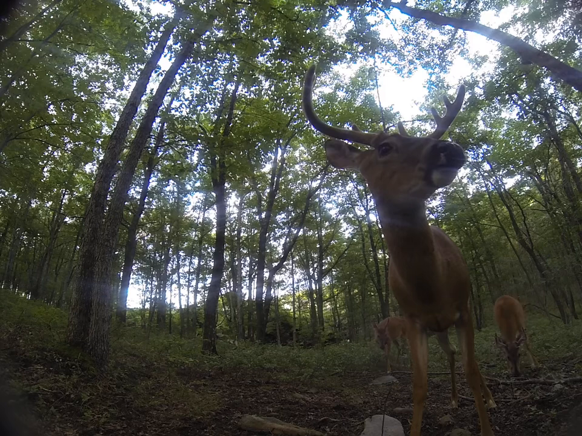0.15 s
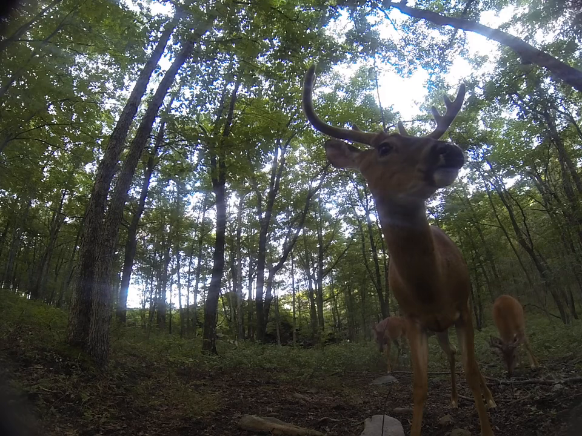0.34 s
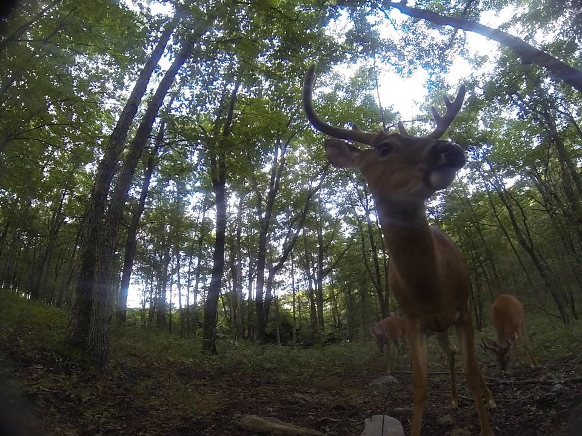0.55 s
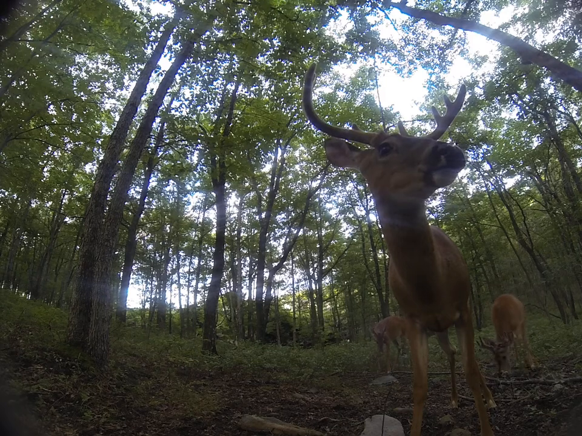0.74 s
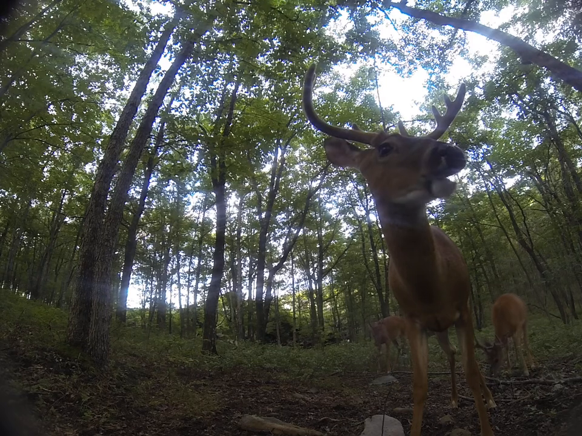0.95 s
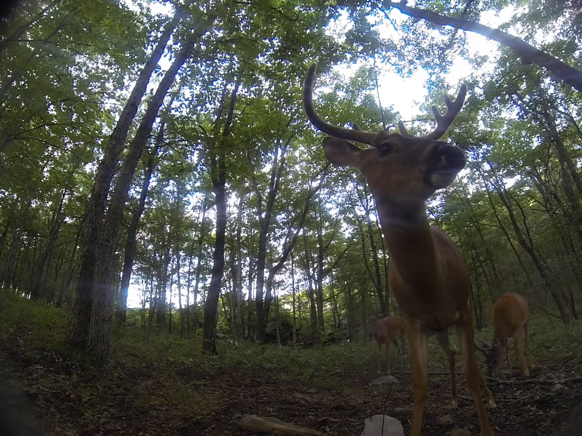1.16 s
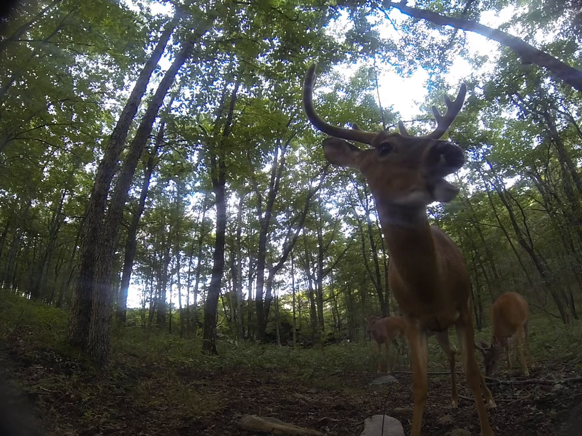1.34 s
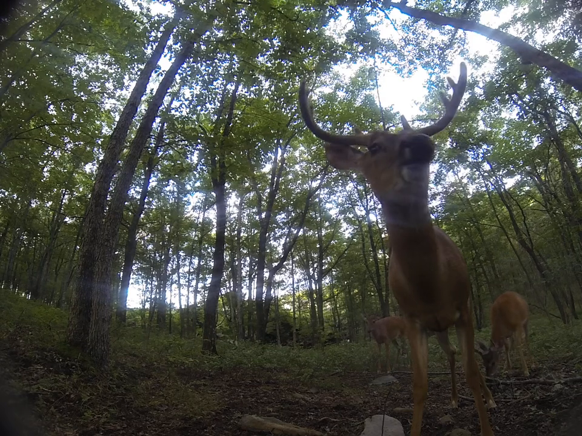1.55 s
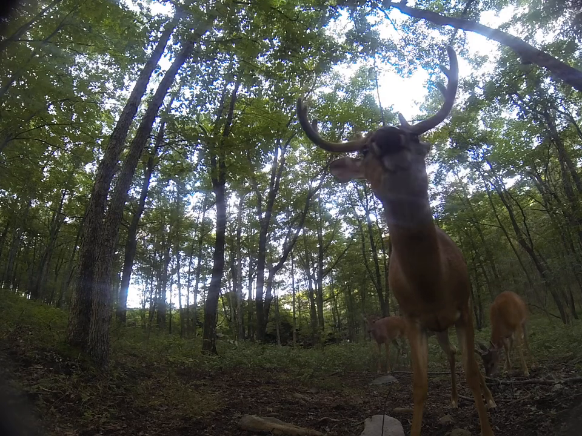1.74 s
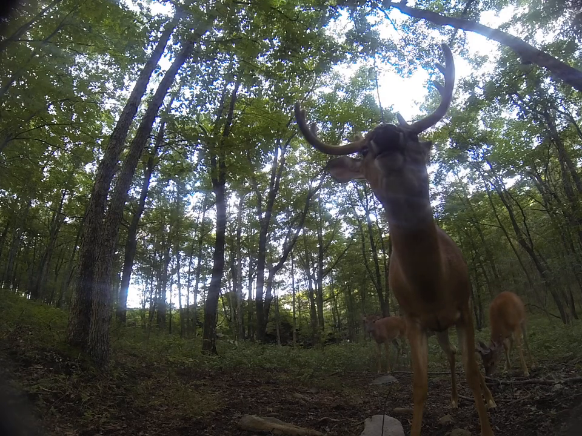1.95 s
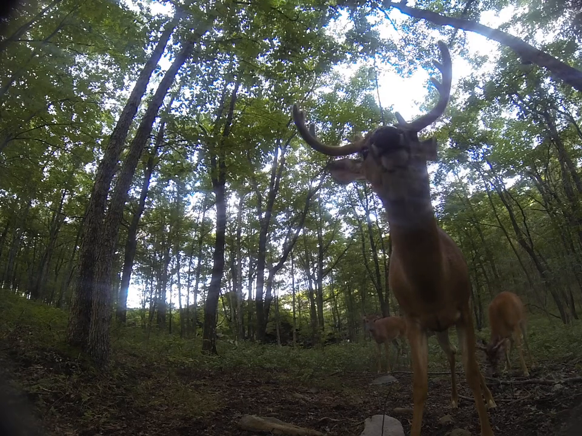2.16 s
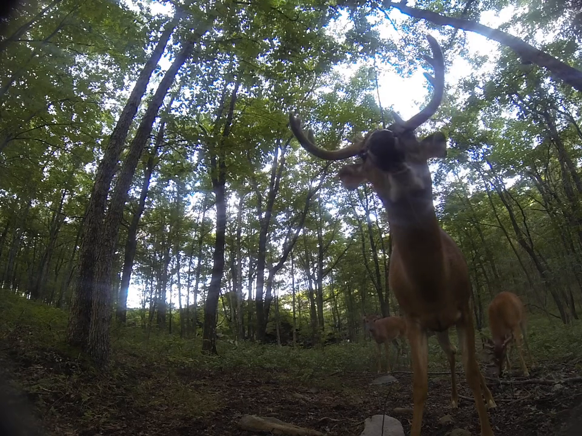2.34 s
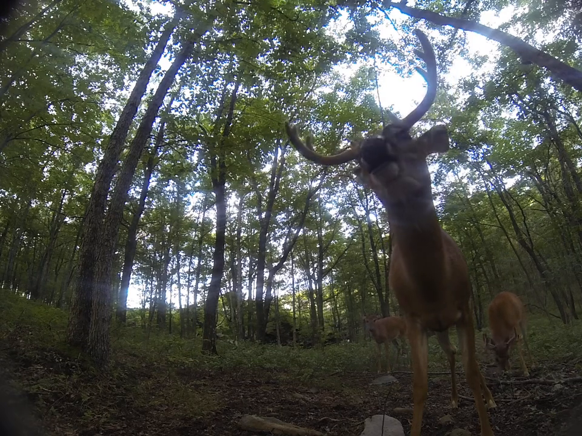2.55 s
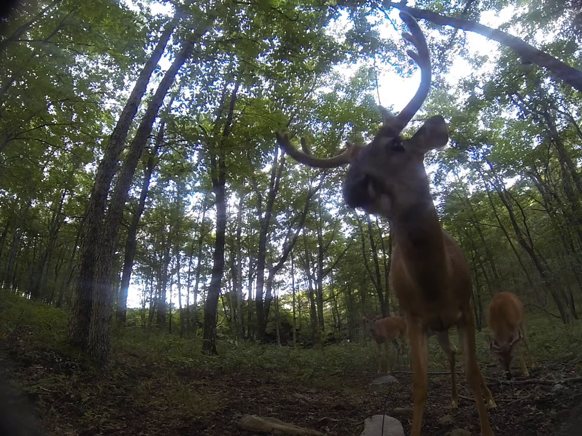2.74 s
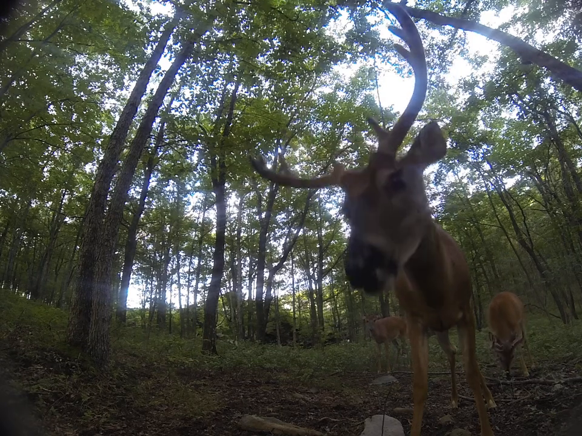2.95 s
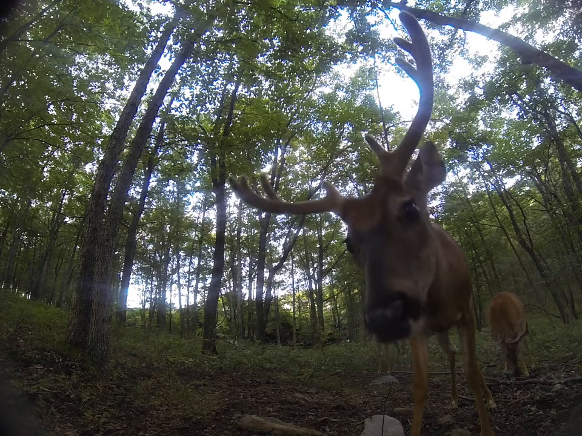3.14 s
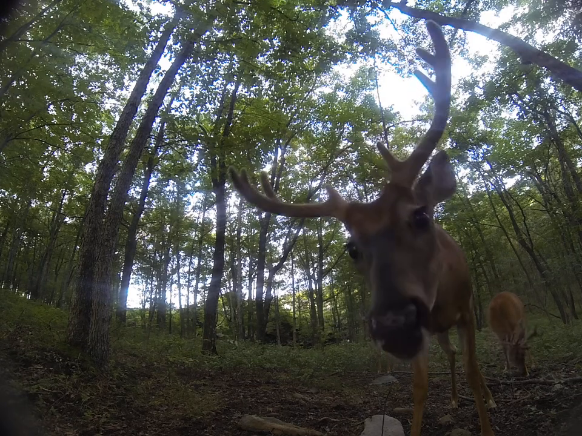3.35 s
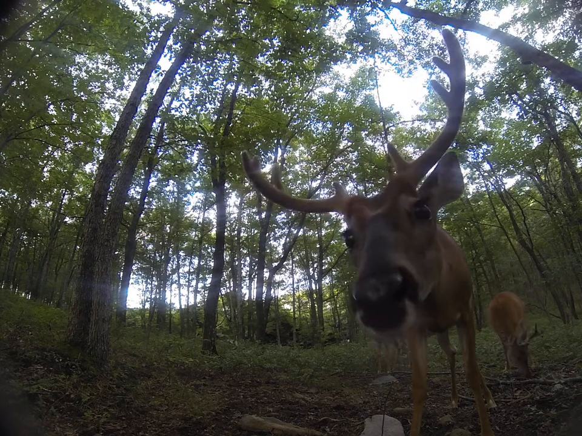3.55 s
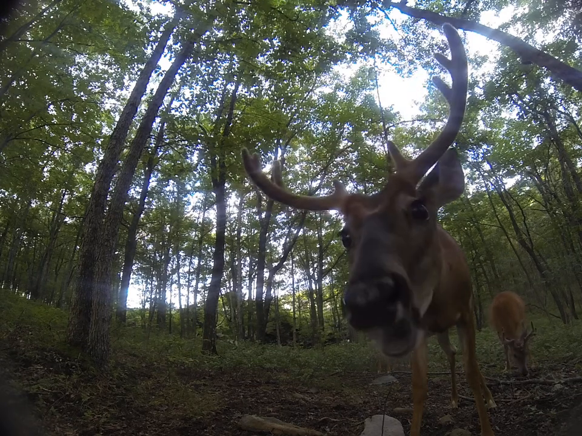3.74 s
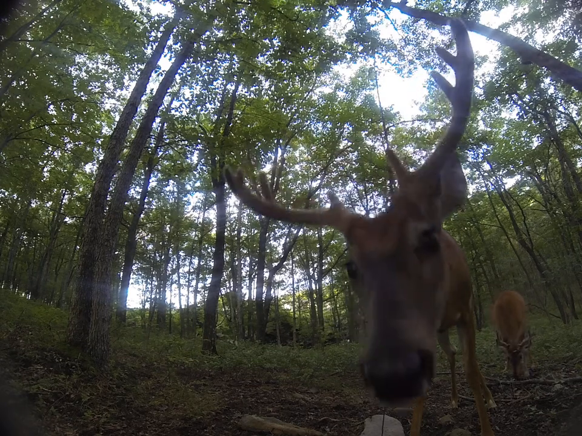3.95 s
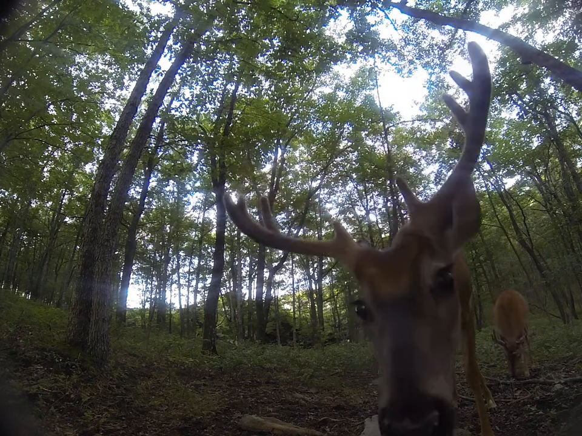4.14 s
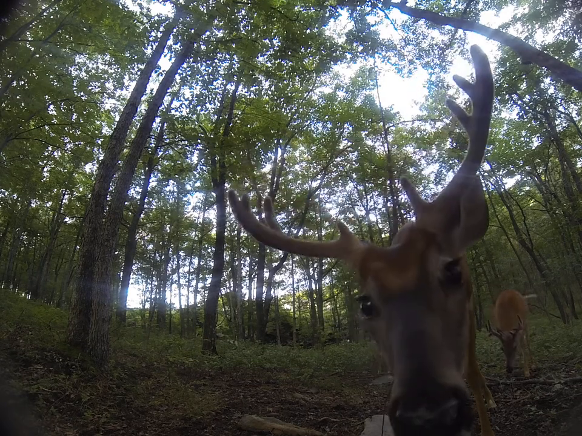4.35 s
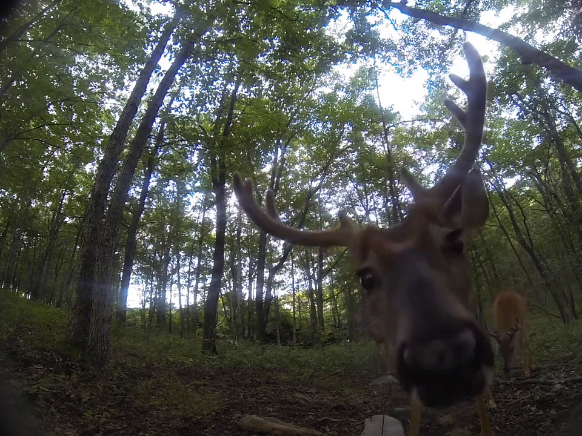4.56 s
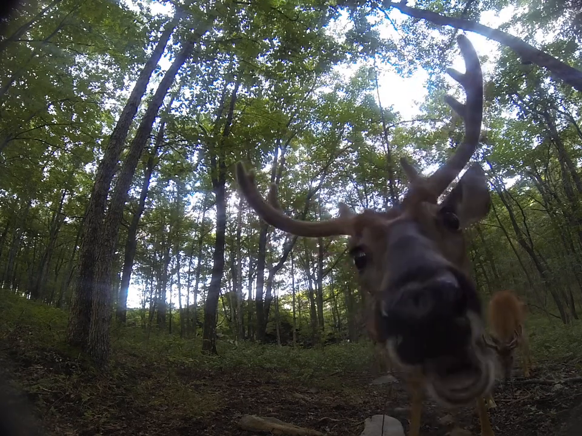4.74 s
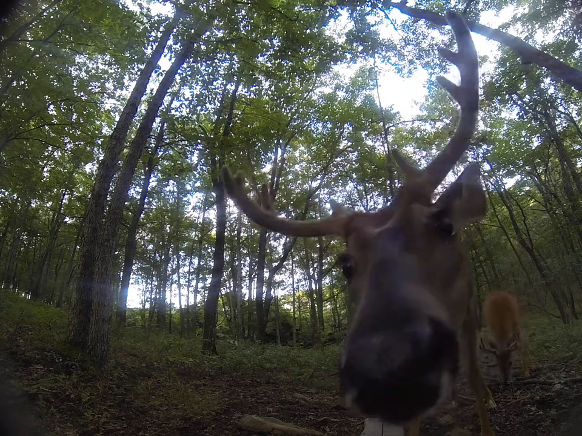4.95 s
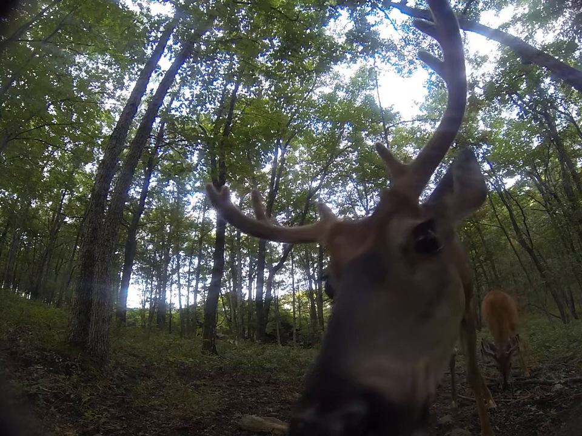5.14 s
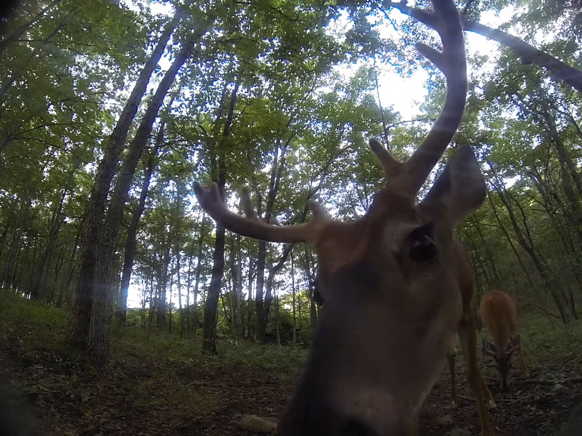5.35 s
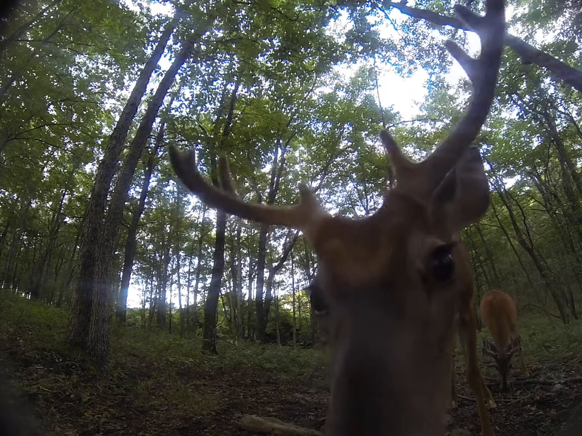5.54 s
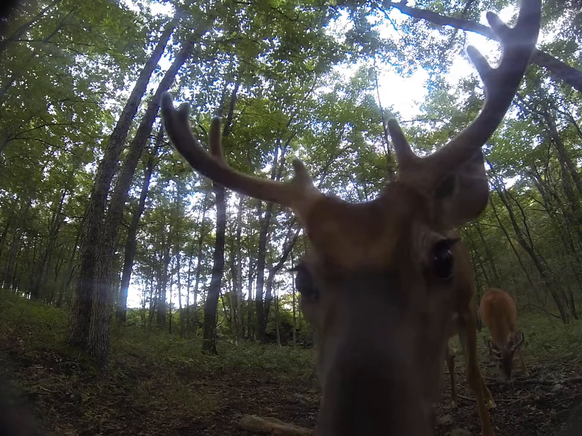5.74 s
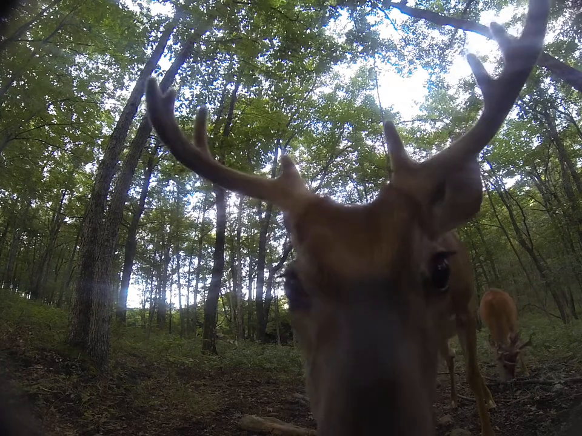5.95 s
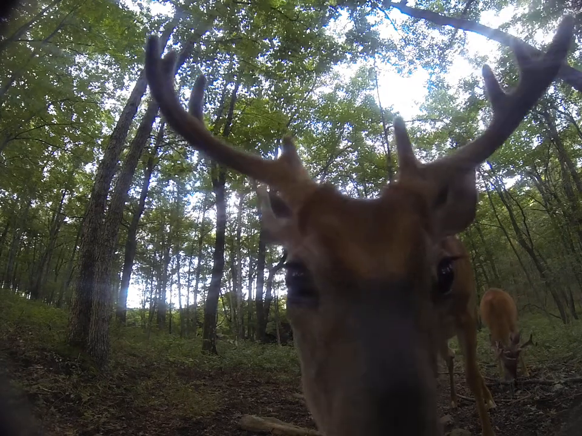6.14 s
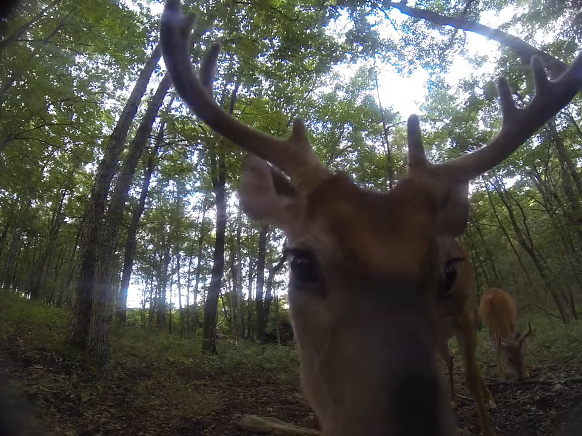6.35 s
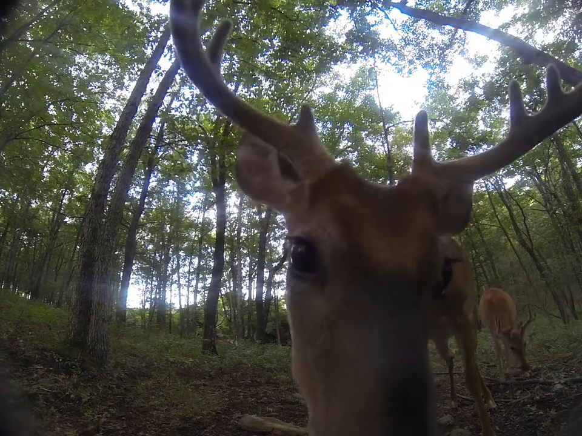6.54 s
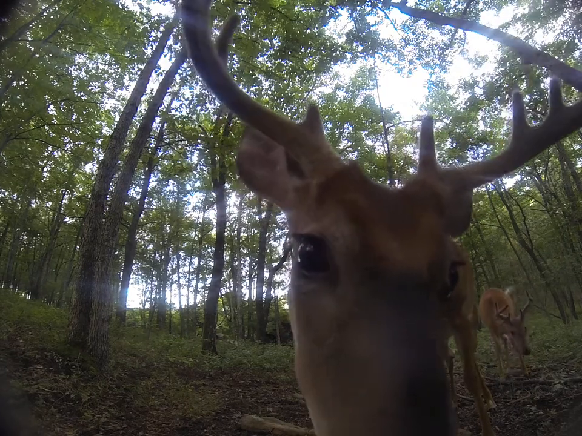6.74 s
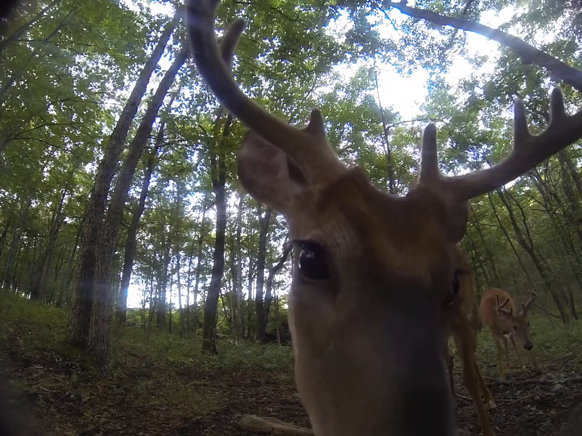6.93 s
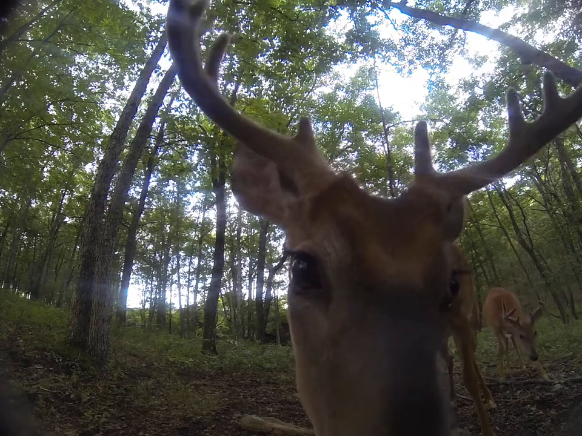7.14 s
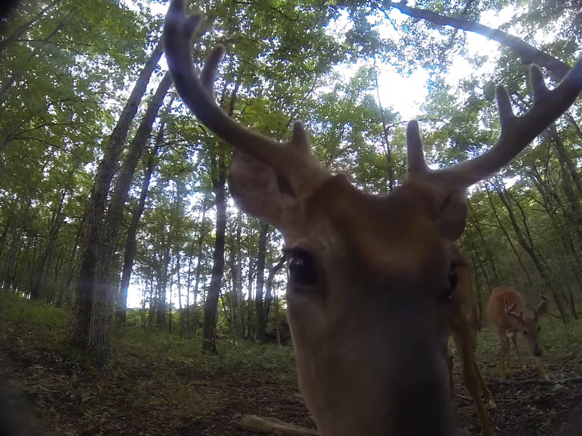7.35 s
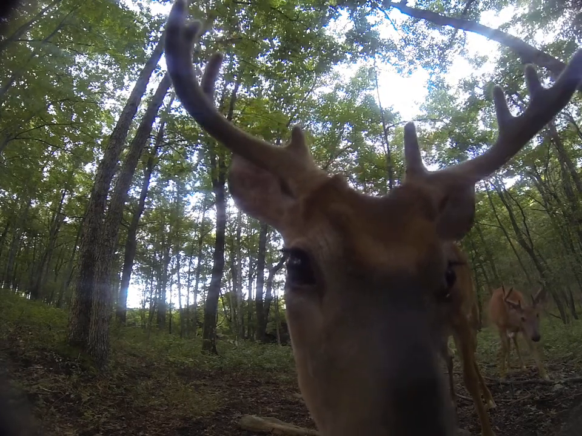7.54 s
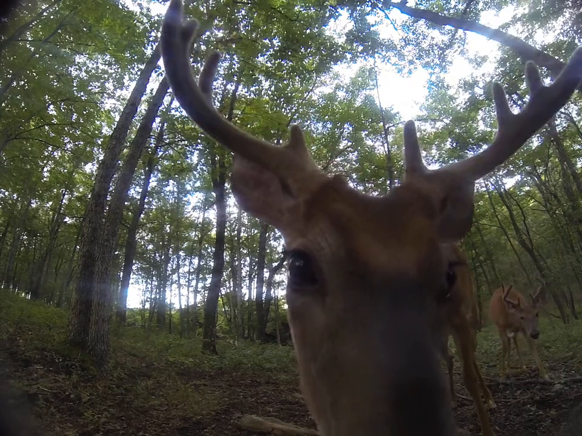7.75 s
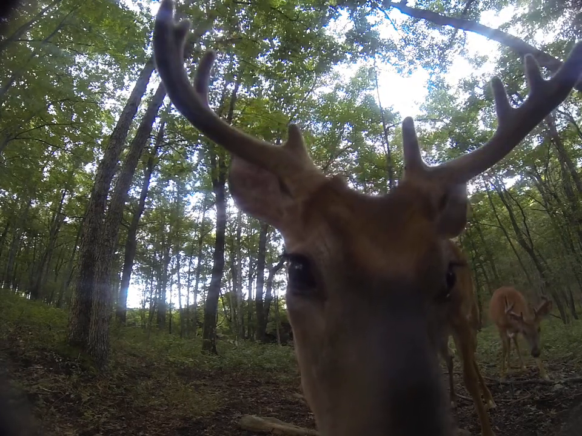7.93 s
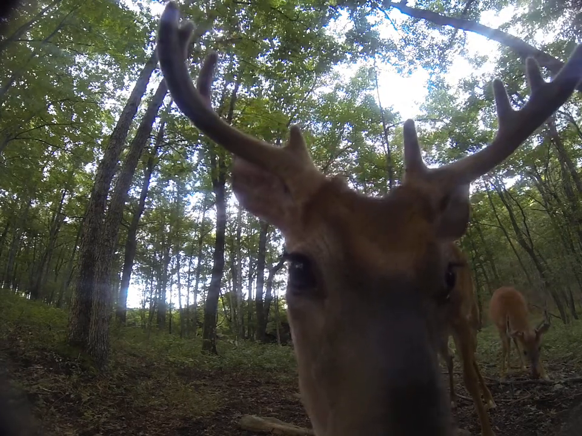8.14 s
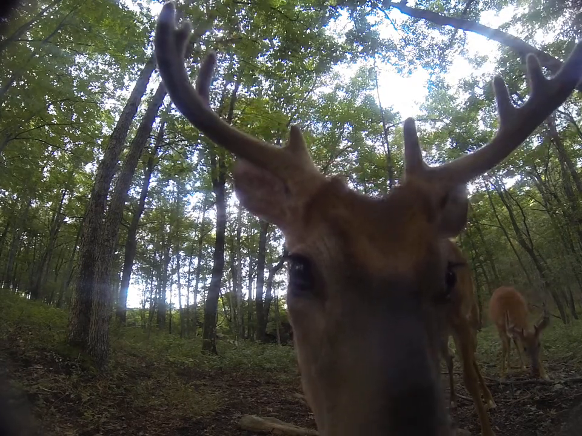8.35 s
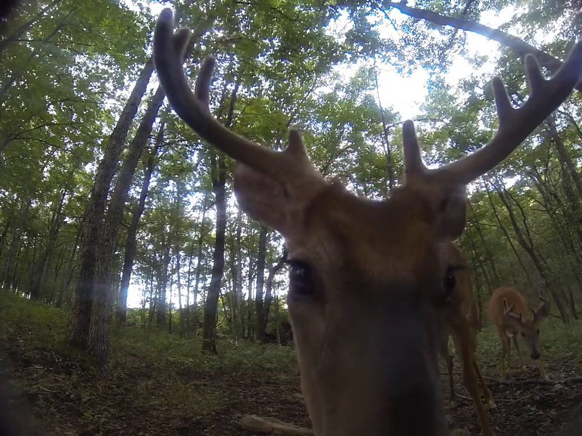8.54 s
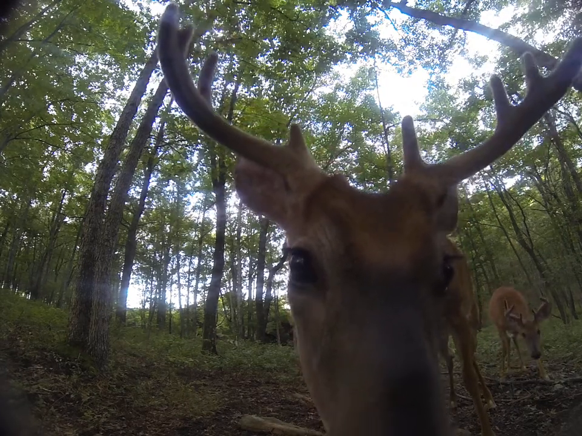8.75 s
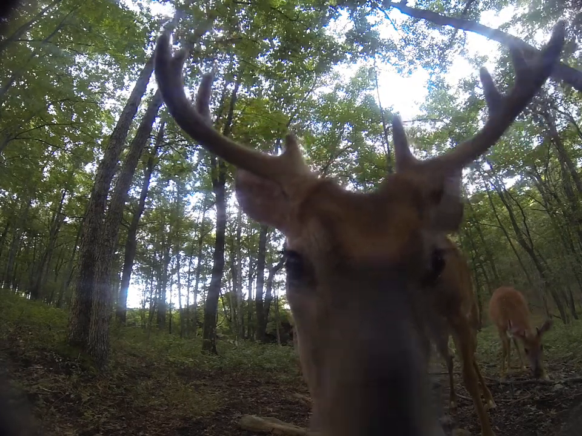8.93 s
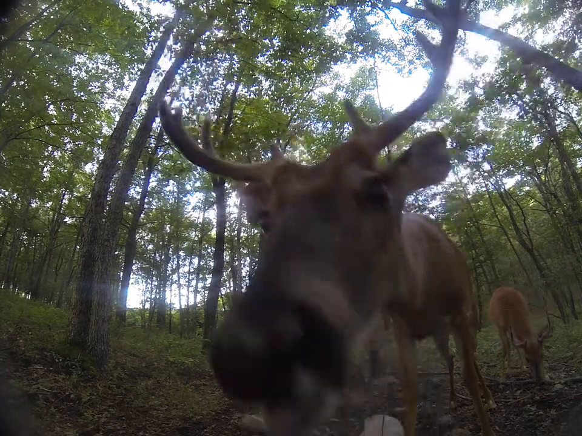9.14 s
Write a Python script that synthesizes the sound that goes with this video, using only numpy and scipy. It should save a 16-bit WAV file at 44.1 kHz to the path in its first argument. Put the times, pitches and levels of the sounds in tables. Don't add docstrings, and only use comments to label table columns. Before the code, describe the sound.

A sealed-case microphone on the forest floor gives a dull, hissy near silence with sparse chewing clicks. Then a deer rubs directly on the case, with dense, irregular hard plastic knocks, wet skin catching and slipping, short ringing rasps and a deep rocking rumble. The contact thins, one big low thud lands, and faint brushing gives way to leaves as the animal backs off.

```python
import sys
import numpy as np
from scipy import signal
from scipy.fft import rfft, irfft, next_fast_len
from scipy.io import wavfile
from scipy.ndimage import uniform_filter1d, map_coordinates

SR = 44100
rng = np.random.default_rng(int(sys.argv[2]) if len(sys.argv) > 2 else 0)


def dump(signal):
    limited = np.clip(np.atleast_2d(signal).T, -1, 1)
    pcm = np.round(limited * 32767).astype(np.int16)
    wavfile.write(sys.argv[1], SR, pcm)


def convert_level_to_amplitude(level_db):
    exponent = np.asarray(level_db, float) / 20
    return 10 ** exponent


N = 409688

CRACK = 1.17


def unit(x):
    return x / np.sqrt(np.mean(x ** 2) + 1e-20)


def wobble(rate):
    values = rng.standard_normal(int(N * rate / SR) + 4)
    return map_coordinates(values, [np.arange(N) * rate / SR])


def curves(rows):
    s, *columns = np.transpose(rows)
    return [np.interp(np.arange(N) / SR, s, column, left=-120) for column in columns]


def place(times, shapes):
    starts = np.round(np.asarray(times) * SR).astype(int)[:, None]
    at = starts + np.arange(shapes.shape[1])
    return np.bincount(at.ravel(), shapes.ravel(), N + SR)[:N]


def filtered(x, response):
    n = x.shape[-1]
    padded = 2 * next_fast_len(n // 2 + 2048)
    spectrum = rfft(x, padded) * response(np.fft.rfftfreq(padded, 1 / SR))
    return irfft(spectrum, padded)[..., :n]


def along(points, hz):
    f, db = np.transpose(points)
    return convert_level_to_amplitude(np.interp(np.log(hz + 1), np.log(f), db))


def quieter(table, drop_db):
    return [(centre, width, db - drop_db) for centre, width, db in table]


# f/Hz, level/dB
WALL = [(20, 8.5), (780, 7), (1010, -8.5), (1210, 3), (6000, -9), (11000, -17), (14000, -14.5),
        (16000, -43.5)]


def resonance(table, hz):
    power = 0
    for centre, width, db in table:
        damping = (hz * width) ** 2
        peak = damping / ((centre * centre - hz * hz) ** 2 + damping)
        power = power + convert_level_to_amplitude(2 * db) * peak ** 2
    return np.sqrt(power) * along(WALL, hz)


def modes(table, hz):
    cepstrum = irfft(np.log(resonance(table, hz) + 1e-7))
    cepstrum[1:len(hz) - 1] *= 2
    cepstrum[len(hz):] = 0
    return np.exp(rfft(cepstrum))


def snaps(times, parts, rise_s, t60_s, blow=0, size=2048):
    t = np.arange(size) / SR
    draw = rng.standard_normal((len(times), size + 1))
    fall_s = t60_s * convert_level_to_amplitude(2.5 * draw[:, :1])
    force = draw[:, 1:] * (1 - np.exp(-t / rise_s)) ** 2 * convert_level_to_amplitude(-60 * t / fall_s)
    force[:, int(rise_s * SR)] += blow * np.sign(draw[:, 0]) * np.linalg.norm(force, axis=1)
    out = 0
    for table, peak_db in parts:
        rung = filtered(force, lambda hz: modes(table, hz))
        out = out + convert_level_to_amplitude(peak_db)[:, None] * rung / np.abs(rung).max(axis=1, keepdims=True)
    return place(times, out)


# f/Hz, level/dB per Hz
HISS = [(20, -1), (100, -3.5), (300, -13), (1000, -21.5), (3000, -32.5), (8000, -34), (14800, -39.5),
        (15300, -67)]
# f/Hz, level/dB rms
CLOCK = [(2000, -91), (3000, -82), (4000, -98), (5000, -96)]


def electronics():
    t = np.arange(N) / SR
    hiss = unit(filtered(rng.standard_normal(N), lambda hz: along(HISS, hz)))
    tones = sum(np.sqrt(2) * convert_level_to_amplitude(db) * np.sin(2 * np.pi * hz * t) for hz, db in CLOCK)
    frame_hz = 47.952
    begin, end = .405, .82
    frame, part = np.divmod(t * frame_hz, 1)
    since_s = (part - begin) / frame_hz
    reading = uniform_filter1d(1. * (part > begin) * (part < end), size=30)
    start = rng.uniform(0, 2 * np.pi, int(frame[-1]) + 1)[frame.astype(int)]
    high = np.sin(2 * np.pi * 12895 * since_s + start)
    low = np.sin(2 * np.pi * 6480 * since_s + np.pi / 2 * (frame % 2) + .3 * start)
    whine = reading * (convert_level_to_amplitude(-71) * high + convert_level_to_amplitude(-73) * low)
    return convert_level_to_amplitude(-61.0) * hiss + tones + whine


# f/Hz, width/Hz, level/dB
AIR = [(1560, 350, 1), (2160, 840, -3), (2940, 620, 8), (3670, 2200, -3.5), (5400, 890, 3.5),
       (6740, 710, -10.5), (8240, 710, -6), (9200, 360, -7), (10580, 610, 3.5), (13000, 1800, -3.5)]
# t/s, rise of the rustle level/dB
RETREAT = [
    (8.6, -4),
    (8.85, -1),
    (9.051, 0),
    (9.21, 4.5),
    (9.29, -0.5),
]


def wood():
    near_db = np.interp(np.arange(N) / SR, *np.transpose(RETREAT), left=0)
    crackle_db = near_db * (1 + .7 * wobble(97))
    rustle = convert_level_to_amplitude(crackle_db + 0.66 * wobble(3.7)) * rng.standard_normal(N)
    return convert_level_to_amplitude(-59.0) * filtered(rustle, lambda hz: resonance(AIR, hz))


# f/Hz, width/Hz, level/dB
PORT = [(1566, 253, 0)]
PORT_UPPER = [(2040, 680, 5), (2310, 350, 6.5), (3590, 500, -6), (4370, 550, -9), (8200, 830, -3)]
# t/s, peak level/dB, upper resonance level/dB against the peak
CHEWS = [(0.098, -48.5, -17), (0.186, -46, 3.5), (0.579, -51, 7.5), (0.6705, -55.5, 7.5), (1.046, -56, -15),
         (1.695, -41, 4.5), (1.7022, -47, -17), (1.709, -49, -17), (2.049, -51.5, 5), (2.062, -58, 0),
         (2.078, -36.5, -5.5), (2.274, -63, 5), (2.673, -56, 2), (4.497, -49, -7), (4.655, -55, 0),
         (4.928, -55, -5), (5.051, -56, -7), (5.581, -50, -3), (5.589, -55, -3), (5.598, -61, -4),
         (5.667, -51, 2), (5.673, -45, 7), (1.55, -58, -2), (2.6, -60, 4), (3.4, -57, -5),
         (9.194, -54, 5.5), (9.205, -44, -2), (9.13, -52, 3.5), (9.245, -58, 8), (2.1321, -49, -16),
         (2.137, -53, -22), (2.313, -55, -14), (2.6664, -55, 8), (2.705, -53, -14), (2.997, -49, -10),
         (3.445, -53, -16), (3.925, -46.5, -5), (3.972, -43.5, -19), (4.488, -55, -7), (4.525, -44.5, 0),
         (4.917, -35, -2), (4.959, -49.5, -20), (5.028, -54, 2), (5.04, -52.5, 3), (5.3896, -53.5, 0),
         (5.465, -55, 0), (5.523, -44.5, -2), (5.573, -43, -3), (5.6434, -62, 1)]


def chews():
    s, db, upper_db = np.transpose(CHEWS)
    parts = [(PORT, db - .6), (PORT_UPPER, db + upper_db - .6)]
    return snaps(s - .0005, parts, rise_s=0.00062, t60_s=0.015, blow=CRACK)


# t/s, peak level/dB, f/Hz, time to fall by 60 dB t60/s
PUSHES = [(4.485, -52.5, 104, 0.29), (4.723, -48.5, 107, 0.2), (4.811, -50.5, 98, 0.18),
          (5.695, -19, 101, 0.13), (5.911, -14, 88, 0.2), (6.005, -16, 91, 0.19), (6.17, -21, 104, 0.17),
          (6.376, -28.5, 105, 0.38), (6.708, -15.5, 117.6, 0.1), (6.846, -28.5, 117, 0.15),
          (6.956, -18.5, 117.6, 0.1), (7.206, -12.5, 95, 0.22), (7.469, -13, 94, 0.094),
          (7.717, -21.5, 107.4, 0.21), (7.792, -16.5, 82, 0.18), (7.946, -26, 114, 0.17),
          (8.16, -19.5, 91, 0.29), (8.298, -21.5, 92.8, 0.27), (8.585, 3, 94.5, 0.13),
          (8.682, -14.5, 82.1, 0.21), (8.729, -19, 94.4, 0.21)]


def pushes():
    s, db, hz, t60 = np.array(PUSHES).T[:, :, None]
    t = np.arange(SR // 2) / SR
    swing = convert_level_to_amplitude(-60 * t / (1.56 * t60)) * np.sin(2 * np.pi * .88 * hz * t + 1.36)
    jolt = 1.92 * convert_level_to_amplitude(-60 * t / (0.36 * t60)) * np.sin(2 * np.pi * 1.177 * hz * t - .3)
    onset = (1 - np.exp(-t / 0.0058)) ** 2
    return place(s[:, 0], convert_level_to_amplitude(db - 1.74) * onset * (swing + jolt))


# f/Hz, width/Hz, level/dB
MOUNT = [(82, 39, 4.1), (104, 58, 2.3)]
# t/s, shake level/dB, pressure rumble level/dB
LEAN = [(5.5, -80, -95), (5.73, -56, -41), (5.85, -39.5, -41), (6.4, -42, -47.5), (7.1, -42, -37.5),
        (8.06, -42, -44), (8.14, -43.5, -37), (8.55, -62.5, -47), (8.61, -39, -41.5), (8.75, -45, -38),
        (8.96, -56.5, -52.5), (9.16, -57, -68), (9.29, -60.5, -60)]


def lean():
    shake_db, rumble_db = curves(LEAN)
    shake = unit(filtered(rng.standard_normal(N), lambda hz: resonance(MOUNT, hz)))
    air = [(26.3, 12, 0.0088)]  # f/Hz, width/Hz, level/dB
    rumble = unit(filtered(rng.standard_normal(N), lambda hz: resonance(air, hz)))
    return convert_level_to_amplitude(shake_db + 2.2) * shake + convert_level_to_amplitude(rumble_db + 1.8) * rumble


# t/s, length/s, rasp level/dB, ring level/dB against it
RASPS = [(5.694, 0.027, -38.5, -4), (5.73, 0.031, -65, 15), (5.881, 0.02, -33, -4), (6.056, 0.013, -50, -4),
         (6.119, 0.011, -22.5, -3.5), (6.158, 0.034, -33.5, 0), (6.278, 0.015, -28.5, -2),
         (6.311, 0.036, -31, 1), (6.343, 0.02, -29.5, 7.5), (6.403, 0.022, -32, 4.5),
         (6.432, 0.013, -18.5, -2), (6.508, 0.022, -43, 7), (6.566, .02, -52, 0), (6.586, 0.013, -23, 1),
         (6.641, 0.036, -39, -2), (6.707, 0.03, -40, 1), (6.799, 0.068, -47.5, 0),
         (6.948, 0.051, -43.5, 10.5), (7.054, 0.028, -40.5, 4.5), (7.103, 0.027, -40, -1),
         (7.133, 0.034, -42, 12.5), (7.164, 0.023, -47, 0), (7.201, 0.017, -26, -7), (7.307, 0.04, -41, 9),
         (7.358, 0.022, -22.5, 5.5), (7.385, 0.048, -32.5, -0.5), (7.449, 0.035, -34, -1),
         (7.547, 0.034, -51, 13), (7.608, 0.027, -34, 0), (7.64, 0.035, -36, 7), (7.682, 0.022, -28, -7),
         (7.708, 0.042, -39.5, 5.5), (7.785, 0.039, -43, 7), (7.84, 0.039, -37, 2),
         (7.889, 0.0086, -21, -1), (7.902, 0.044, -41, 11), (8.075, 0.02, -42, 10),
         (8.091, 0.017, -30.5, -4), (8.162, 0.015, -44, 6), (8.231, 0.015, -47, 10), (8.266, 0.012, -36, 7),
         (8.287, 0.012, -45, 2), (8.551, 0.036, -49, 0), (8.59, 0.045, -58, 13), (8.322, 0.031, -53, 17),
         (8.413, 0.027, -58.5, 5), (8.695, 0.026, -57, 2)]


def rasps():
    s, length_s, db, ring_db = np.transpose(RASPS)
    steps = []
    for level in (convert_level_to_amplitude(db), convert_level_to_amplitude(db + ring_db)):
        steps.append(place(s, level[:, None]) - place(s + length_s, level[:, None]))
    edge = int(0.0055 * SR)
    return np.abs(uniform_filter1d(np.cumsum(steps, axis=1), edge, axis=1))


# release t/s, drone level/dB
PRESSES = [(5.718, -37), (5.932, -35.5), (6.179, -33), (6.44, -41.5), (6.73, -39.5), (6.97, -52),
           (7.22, -39), (7.469, -38.5), (7.64, -40), (7.73, -35), (7.881, -33.5), (8.17, -60),
           (8.28, -38.5), (8.622, -53)]


def lid_level(scrape_db):
    s, db = np.array(PRESSES).T[:, :, None]
    t = np.arange(-SR // 2, SR // 2) / SR
    press_db_per_s, release_db_per_s = 195, 255
    fall_db = np.where(t < 0, -press_db_per_s * t, release_db_per_s * t)
    swells = place(s[:, 0] - .5, convert_level_to_amplitude(db - fall_db))
    touching = np.arange(N) > PRESSES[0][0] * SR - SR // 50
    murmur_db = -60.5
    return convert_level_to_amplitude(scrape_db - 4.5) + touching * (swells + convert_level_to_amplitude(murmur_db))


# f/Hz, width/Hz, level/dB
RING = [(1323, 217, 5.5), (1378, 413, -6.5)]
BODY = [(2315, 258, -1.4), (2586, 520, -2.5), (3186, 472, 0.93)]
EDGE = [(4616, 210, 4.5), (5020, 680, 5.5), (6550, 610, -4.5), (8300, 1740, -9.5), (8970, 300, -31.5),
        (10300, 500, -19.5), (11860, 1500, -41), (13330, 1500, -33)]
# f/Hz, width/Hz, level/dB
LID = [(316, 87, 0.5), (350, 460, -8.5), (484, 110, -7.5), (670, 83, -12)]
# t/s, scrape level/dB
DRAG = [(5.5, -83), (5.66, -63.5), (5.7, -52.5), (5.87, -49.5), (6.03, -52), (6.18, -56), (6.3, -44.5),
        (6.45, -39.5), (6.49, -53.5), (6.62, -59.5), (6.73, -36.5), (6.77, -54.5), (6.9, -44),
        (7.02, -53.5), (7.47, -41.5), (7.77, -54.5), (8.02, -54), (8.28, -46.5)]
# t/s, scrape level/dB
BRUSH = [
    (8.35, -55),
    (8.44, -69),
    (8.54, -62.5),
    (8.66, -51),
    (8.751, -52.5),
    (8.93, -66),
    (9.29, -73),
]


def drag():
    scrape_db, = curves(DRAG + BRUSH)
    clumps_db = 3 * wobble(30)
    catches = np.clip(wobble(500) - .3, 0, 1.6)
    grains = convert_level_to_amplitude(.6 * clumps_db + 6.5 * catches) * rng.standard_normal(N)
    case = quieter(BODY, 3.5) + quieter(EDGE[:2], 20.0) + quieter(EDGE[2:], 24.0) + [(1744, 410, -5)]
    body = unit(filtered(grains, lambda hz: modes(case, hz)))
    ring = unit(filtered(grains * convert_level_to_amplitude(2.16 * wobble(45)), lambda hz: modes(RING, hz)))
    lid_force = convert_level_to_amplitude(1.2 * clumps_db + 2.76 * wobble(14)) * rng.standard_normal(N)
    lid_modes = LID[:1] + quieter(LID[1:], 1.0)
    lid = unit(filtered(lid_force, lambda hz: resonance(lid_modes, hz)))
    rasp, flare = rasps()
    bed = convert_level_to_amplitude(scrape_db)
    return (bed + rasp) * body + (convert_level_to_amplitude(5.5) * bed + flare) * ring + lid_level(scrape_db) * lid


def slips(rows, rise_s, t60_s, sparkle_db, blow):
    s, db, ring_db, edge_db = np.transpose(rows)
    main = [(BODY, db - .6), (RING, db + ring_db - .6), (EDGE[:3], db + edge_db - .6)]
    after = [(table, peak_db - drop_db) for (table, peak_db), drop_db in zip(main, (17, 17, 21))]
    top_db = 1.14 * db + edge_db + sparkle_db
    parts = main + [(EDGE[3:], top_db), (LID[:3], db + ring_db - 21)]
    snap = snaps(s - .65 * rise_s, parts, rise_s, t60_s, blow)
    return snap + snaps(s + .003, after, rise_s=0.00087, t60_s=0.016, size=1536)


# t/s, peak level/dB, 1.3 kHz ring
# level/dB and bright edge level/dB against the peak
HARD_CONTACTS = [(5.9353, -3.5, 0, -7.5), (5.9723, -12.5, 1, -17), (6.0979, -6.5, 2, -13), (6.126, -8, -2, -3.5),
                 (6.1627, -11.5, -8, -11), (6.2793, -8.5, -3, -14.5), (6.3226, -11, -8, -17),
                 (6.3462, -5, -4, -11.5), (6.4304, -2, -6.5, -15), (6.4419, -9, 2.5, -8), (6.5872, -2.5, -7, -12),
                 (6.6394, -12.5, 1, -2), (6.695, -8.5, -4, -11), (6.872, -3.5, 0, -8), (6.9447, -12.5, 0, -13.5),
                 (7.0655, -13.5, 2, -1), (7.1066, -13.5, -0.5, -6.5), (7.2104, -10.5, -2.5, -2.5),
                 (7.3607, -11.5, 3, -10.5), (7.3704, -9.5, 4, -9.5), (7.3983, -7.5, -1, -8),
                 (7.6851, -15, -19, -19), (7.8458, -8, 0.5, -29), (7.889, -10.5, -4, -8.5),
                 (7.9756, -3, -1.5, -12), (8.093, -13, -1, -29), (8.2339, -12, 4.5, -22), (8.2642, -4, -7, -15.5),
                 (8.2704, -7.5, -4.5, -14), (8.6812, -3, -6, -6.5),
                 (5.701, -24.5, 7.5, -10), (5.8918, -20.5, 1, -3), (6.059, -30, 1, -7), (6.2041, -17.5, 1.5, -6),
         (6.239, -22.5, -0.5, -8), (6.3566, -15.5, 4, -3), (6.372, -14.5, -5, -10),
         (6.411, -10.5, -0.5, -20), (6.4655, -14, -6.5, -16), (6.556, -14.5, -3, -11),
         (6.649, -11, -2, -17), (6.6645, -14.5, -7, -29), (6.7096, -16.5, 0, -15), (6.831, -15.5, 6, -19),
         (7.04, -21.5, 2, -11), (7.076, -17.5, 2, -2), (7.123, -20, 4, -4), (7.143, -17, -8, -5.5),
         (7.161, -25.5, 4, 5.5), (7.201, -22, -8, 0), (7.271, -17, -12, -7.5), (7.3337, -15, -7, -12),
         (7.391, -10.5, -5.5, -10), (7.458, -19.5, 3, 0.5), (7.568, -19, 0.5, -2.5), (7.7274, -24, 7.5, -4),
         (7.8674, -17.5, 7, -10), (7.9191, -22.5, -10, -15), (8.3121, -21, 9, -21), (8.7218, -25, 0, -19),
         (8.389, -40, 6, -12), (8.825, -44.5, 8, -3), (6.3282, -12.5, -4, -14.5), (7.698, -25, -6, -14)]


def hard_contacts():
    return slips(HARD_CONTACTS, rise_s=0.001807, t60_s=0.0053, sparkle_db=-15, blow=CRACK)


# t/s, peak level/dB, 1.3 kHz ring level/dB and
# bright edge level/dB against the peak
SMALL_SLIPS = [(5.709, -23, 7, -8.5), (5.7203, -28, 0, -19), (5.7486, -36, 9, -22), (5.7552, -31.5, 5, -9),
               (5.8046, -35, 6, -15), (5.8569, -35, 9.5, -28), (5.8968, -21.5, 0.5, -6.5),
               (5.9113, -34, 1, -14), (5.9221, -30, -3, -15), (5.9864, -28, 7.5, -11),
               (6.0442, -40.5, 14.5, -21), (6.0648, -25.5, -2, -6), (6.0824, -34.5, 14, -9),
               (6.1133, -18, 5, -28), (6.1193, -21.5, 4, -14), (6.172, -21, -3, -10), (6.2137, -37, 4, -27),
               (6.2305, -28, -7, -30), (6.2579, -25.5, 5, -11), (6.267, -36, 8, -11),
               (6.2838, -12, -4, -23), (6.3066, -21, -10, -24), (6.3171, -17.5, 0, -13),
               (6.338, -16, 1.5, -21), (6.3638, -13.5, 4, -11), (6.3843, -27.5, -7, -3),
               (6.3955, -24, -2, -4), (6.4554, -22.5, 5, -13), (6.4947, -25.5, 2.5, -23),
               (6.5241, -27.5, 2.5, -29), (6.5336, -21.5, -6, -24), (6.5478, -23, -6, -17),
               (6.5615, -20, -9, -12), (6.5674, -16, -10, -18), (6.5786, -26, -5, -26),
               (6.597, -13.5, -2.5, -29), (6.6321, -20, -2, -26), (6.6567, -19.5, 4, -12),
               (6.7033, -27, 0, -4), (6.7274, -20.5, 0, -6.5), (6.7343, -32, 2, -12), (6.8137, -32, -2, -4),
               (6.9144, -36, 8, -16), (6.9264, -29, -4, -7), (6.9828, -32, 5, -24), (7.0449, -27, -3, -12),
               (7.0926, -31, -12, -24), (7.1008, -23, -9, 0), (7.112, -16, 2.5, -11), (7.1823, -32, -3, -7),
               (7.1902, -32, 1, -4), (7.2217, -24.5, 3, -7), (7.308, -34, 9, -16), (7.32, -33, 7, -8),
              (7.3825, -25, 11, -5), (7.4044, -16.5, 4.5, -8), (7.4143, -18, 2, -19), (7.428, -27, -2, 0),
              (7.4361, -24.5, 6.5, -8), (7.4748, -26, 5.5, -5), (7.542, -27, 0, -28),
              (7.562, -18.5, 0.5, -16), (7.5854, -29, 0, -15), (7.594, -28.5, 8, -12),
              (7.6098, -21.5, -10, -7), (7.614, -29, -6, -11), (7.628, -23, 2, -4), (7.6424, -25, -1, -11),
              (7.651, -17, 0.5, -12), (7.6664, -18.5, 4, -5.5), (7.675, -33, 5, -20),
              (7.6915, -19.5, -4, -18), (7.7487, -34, 7, -17), (7.7752, -29, 4.5, -7),
              (7.793, -25, -1, -7.5), (7.8018, -26, 1, -12), (7.819, -25, 5, -5), (7.828, -21.5, 7, -4.5),
              (7.857, -28.5, 4, -6), (7.8793, -25, 7, -23), (7.947, -23.5, 4, -13), (7.965, -37, 6, -4),
              (8.0298, -38, 14, -21), (8.125, -26, 0, -7), (8.17, -31, -3, -6), (8.19, -35.5, 8, -8),
              (8.1978, -23.5, -2, -20), (8.2147, -30, 5, -10), (8.241, -16.5, 3, -13),
              (8.25, -27.5, 9, -25), (8.2583, -13, 1.5, -15), (8.3425, -27.5, 3.5, -6.5),
              (8.4049, -30, 3.5, -12.5), (8.485, -30.5, -12, -20), (8.562, -33.5, -8, -31),
              (8.691, -30, -11, -21), (8.778, -30.5, 1, -13), (8.804, -29.5, -3, -16),
              (8.882, -41.5, 4, -23), (8.9467, -46.5, 3, -16)]


def small_slips():
    return slips(SMALL_SLIPS, rise_s=0.00137, t60_s=0.0057, sparkle_db=-15.5, blow=CRACK / 2)


# t/s, peak level/dB
BUMPS = [(5.8, -34), (5.934, -22.5), (6.115, -36), (7.368, -23.5), (7.725, -26.5), (8.951, -53),
         (6.586, -23.5), (6.722, -20), (6.98, -30.5), (7.152, -23.5), (7.409, -26.5), (7.647, -24),
         (8.027, -26), (8.262, -24), (8.385, -30.5), (8.414, -49), (8.68, -22), (8.722, -27),
         (8.776, -35.5), (8.827, -36), (8.877, -31), (9.012, -36.5), (9.098, -42), (9.126, -35.5),
         (9.192, -36.5)]


def bumps():
    s, db = np.transpose(BUMPS)
    return snaps(s, [(LID[::2], db - 3.5), (RING, db - 13)], rise_s=0.00292, t60_s=0.028, blow=CRACK)


def scene():
    quiet = electronics() + wood() + chews()
    rub = pushes() + lean() + drag() + hard_contacts() + small_slips() + bumps()
    return (quiet + rub)[None]


def top_cut(x):
    return signal.sosfilt(signal.butter(12, 15800, fs=SR, output="sos"), x)


def record(dry):
    held = dry / (1 + np.abs(dry) ** 20) ** (1 / 20)
    mix = filtered(held, lambda hz: hz < 15750)
    return top_cut(mix)


dry = scene()
out = record(dry)
dump(out)
```